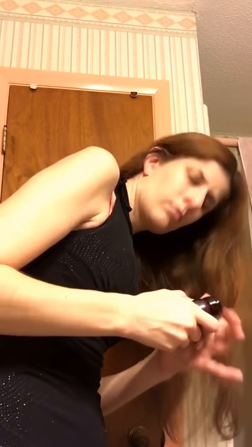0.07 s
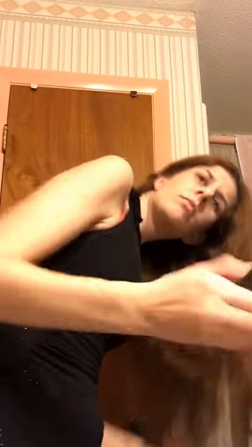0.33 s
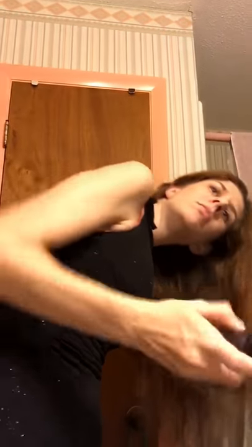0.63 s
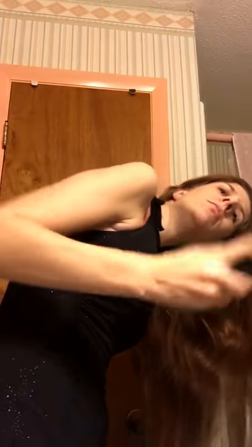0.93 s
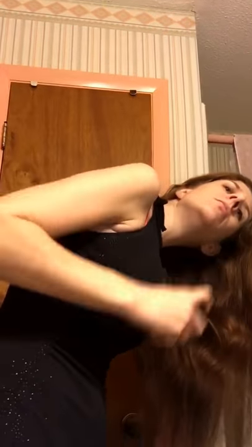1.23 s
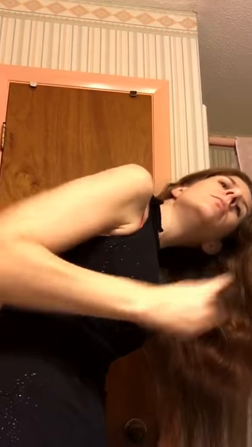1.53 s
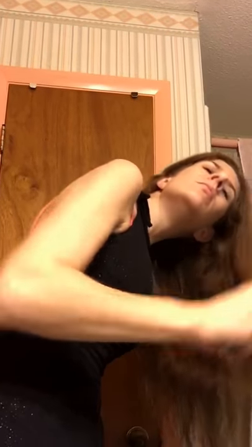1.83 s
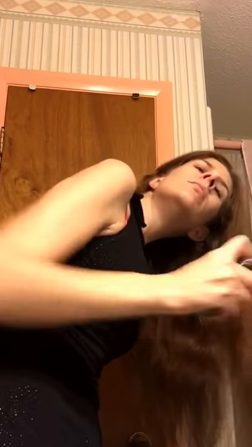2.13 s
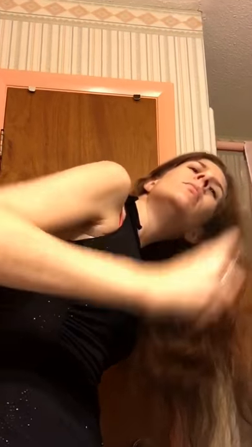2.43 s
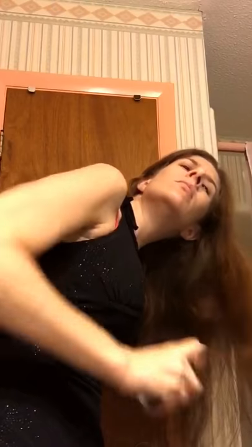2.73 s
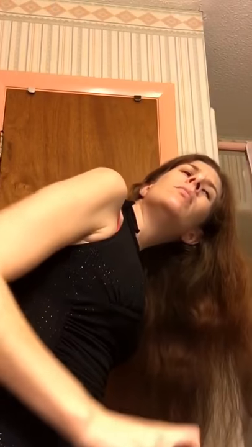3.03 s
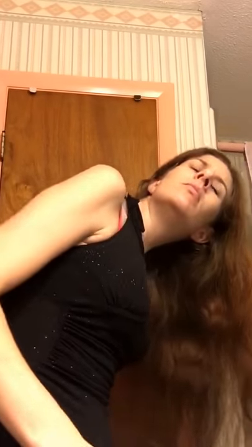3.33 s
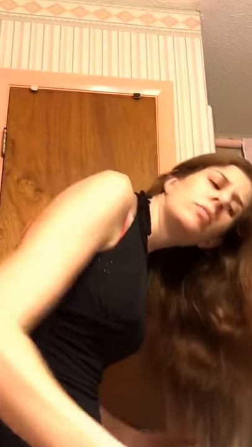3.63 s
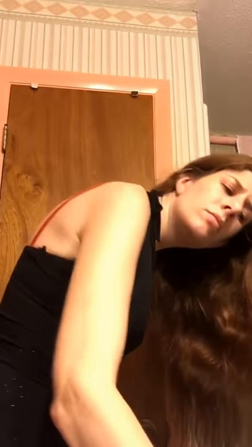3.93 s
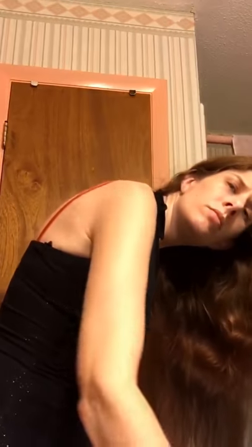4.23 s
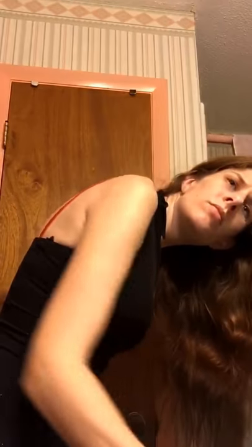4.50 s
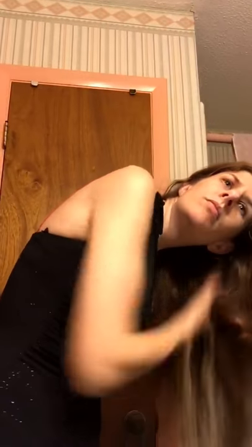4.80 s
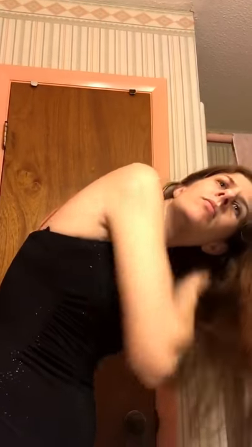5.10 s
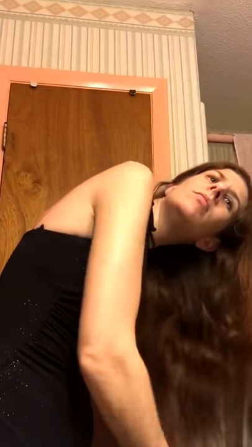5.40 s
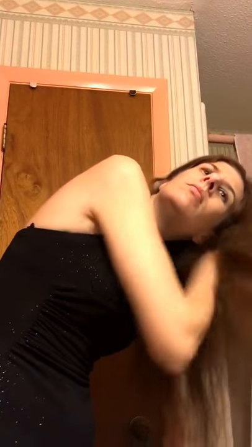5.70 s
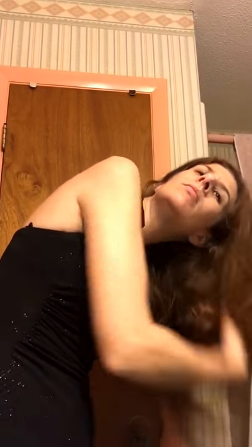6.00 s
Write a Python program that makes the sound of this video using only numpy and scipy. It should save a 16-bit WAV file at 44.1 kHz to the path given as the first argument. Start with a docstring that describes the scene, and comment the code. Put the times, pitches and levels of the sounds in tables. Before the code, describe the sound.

A pump bottle sprays hair twice, then knocks down on a counter, followed by faint hair combing in a small quiet room.

```python
"""A small plastic pump bottle mists long hair twice, a short puff and a long spray: its jet hisses
and breaks into droplets. Fingers tick and rub on the bottle as it is turned in the hand.
Its base then knocks twice on a counter, and a hand combs through the hair, palm swishing.
The small room answers briefly; a fan's air murmurs in it and a far engine hums through the walls."""
import sys
import numpy as np
from scipy import signal
from scipy.fft import rfft, irfft, next_fast_len
from scipy.io import wavfile
from scipy.ndimage import map_coordinates

SR = 44100
rng = np.random.default_rng(int(sys.argv[2]) if len(sys.argv) > 2 else 0)


def generate_wav(signal):
    """Clip the signal to [-1, 1] and save it as 16-bit WAV at the path in sys.argv[1]."""
    frames = np.transpose(np.atleast_2d(signal))
    scaled = np.clip(frames, -1, 1) * 32767
    pcm = np.round(scaled).astype(np.int16)
    wavfile.write(sys.argv[1], SR, pcm)


N = 267025
TIME = np.arange(N) / SR


def amp(db):
    """Decibels to gain."""
    return 10 ** (np.asarray(db) / 20)


def unit_rms(x):
    """Scaled to rms 1."""
    return x / np.sqrt(np.mean(x ** 2) + 1e-20)


def unit_energy(x):
    """Scaled to energy 1."""
    return x / (np.linalg.norm(x) + 1e-20)


def along(points, hz):
    """(Hz, value) points joined on a log frequency axis."""
    point_hz, values = np.transpose(points)
    return np.interp(np.log(hz + 1), np.log(point_hz + 1), values)


def bump(centre_s, sigma_s):
    """Gaussian swell of height 1."""
    return np.exp(-.5 * ((TIME - centre_s) / sigma_s) ** 2)


def wobble(knots_per_s):
    """Smooth random curve, rms near 1."""
    knots = rng.standard_normal(int(N * knots_per_s / SR) + 4)
    return map_coordinates(knots, [TIME * knots_per_s])


def filtered(x, response):
    """x through a complex frequency response."""
    size = next_fast_len(len(x) + SR // 2)
    return irfft(rfft(x, size) * response(np.fft.rfftfreq(size, 1 / SR)), size)[:len(x)]


def coloured(x, spectrum):
    """x shaped by (Hz, dB) points, at rms 1."""
    return unit_rms(filtered(x, lambda hz: amp(along(spectrum, hz))))


def resonances(modes, hz):
    """Causal response of (Hz, width Hz, dB) modes."""
    return sum(amp(db) * 1j * hz * width / (centre ** 2 - hz ** 2 + 1j * hz * width)
               for centre, width, db in modes)


def grainy(grains_per_s, grain_db):
    """White noise strewn with tiny uneven impacts."""
    impacts = (rng.random(N) < grains_per_s / SR) * rng.standard_normal(N)
    return unit_rms(rng.standard_normal(N) + amp(grain_db) * unit_rms(impacts))


def add(track, start_s, sound):
    """Mix a sound into a track."""
    part = track[round(start_s * SR):][:len(sound)]
    part += sound[:len(part)]


# Room decay. Each row: frequency in Hz, T60 in s.
ROOM_T60 = [(120, 0.32), (400, 0.37), (1000, 0.34), (2400, 0.25), (4000, 0.19), (7000, 0.25), (15000, 0.23)]
def in_room(x, wet_db):
    """Direct sound, eight wall echoes and a tail that dies sooner in the treble; power is kept."""
    hz, t, noise = signal.stft(rng.standard_normal(SR // 2), SR, nperseg=256)
    decay = amp(-60 * t / along(ROOM_T60, hz)[:, None])
    onset = 1 - np.exp(-t / 0.0026)
    tail = unit_energy(signal.istft(noise * decay * onset, SR, nperseg=256)[1])
    wall_lags = (SR * rng.uniform(.002, .018, size=8)).astype(int)
    tail[wall_lags] += 0.18 * rng.choice([-1, 1], size=8)
    response = amp(wet_db) * tail
    response[0] += 1
    return signal.fftconvolve(x, unit_energy(response))[:len(x)]


# Revs drop, then creep up. Each row: time in s, firing rate in Hz.
ENGINE_REVS = [(0, 83), (.45, 88), (.8, 89.5), (1.5, 82.5), (2.1, 61.3), (2.9, 62.75), (3.7, 65.4),
               (4.3, 67.2), (5.1, 69.54), (6.05, 68.2)]
# Low room modes. Each row: centre in Hz, sigma in Hz, rms level in dB.
ROOM_BOOMS = [(67.1, 1.35, -63), (84, 3.5, -63)]
def far_engine(leak_db=-76.5, waver_db=2, load_db=-61, load_peak_s=3.754):
    """Two orders pass the walls: the first booms at room modes, the second swells under load."""
    firing_hz = np.interp(TIME, *np.transpose(ENGINE_REVS))
    phase = 2 * np.pi * np.cumsum(firing_hz) / SR
    boom = sum(amp(db) * np.exp(-.5 * ((firing_hz - hz) / sigma_hz) ** 2)
               for hz, sigma_hz, db in ROOM_BOOMS)
    load = bump(load_peak_s, sigma_s=np.where(TIME < load_peak_s, 0.91, 0.64))
    first = (amp(leak_db) + boom) * amp(waver_db * wobble(11)) * np.sin(phase)
    second = amp(load_db + .7 * wobble(12)) * load * np.sin(2 * phase)
    return np.sqrt(2) * (first + second)


# Fan whine. Each row: frequency in Hz, rms level in dB.
FAN_TONES = [(452, -85), (1040, -95)]
# Moving air. Each row: frequency in Hz, relative density in dB.
AIR_SPECTRUM = [(20, -12), (40, 1), (62, 11.5), (82, 12), (100, -2.5), (122, 8), (150, -1.5), (210, -2.5),
                (380, -6), (520, -7), (1200, -11.5), (2500, -13.5), (6500, -21), (8000, -24.5),
                (10400, -28.5), (12000, -26.5), (15500, -28.5)]
def fan(air_db=-69):
    """A steady murmur of air with a faint whine."""
    whine = sum(amp(db) * np.sqrt(2) * np.sin(2 * np.pi * hz * TIME + wobble(25))
                for hz, db in FAN_TONES)
    return whine + amp(air_db) * coloured(rng.standard_normal(N), AIR_SPECTRUM)


# Contact crackle. Each row: frequency in Hz, relative density in dB.
SNAP_SPECTRUM = [(300, 0.5), (1200, -4), (3500, 2.5), (6500, -7), (8000, -8), (10400, -12.5), (12500, -13),
                 (15500, -19)]
def contact_snap(t, t60_s):
    """The dry, fast-dying crackle of a contact on plastic."""
    return coloured(rng.standard_normal(len(t)), SNAP_SPECTRUM) * amp(-60 * t / t60_s)


# Each row: start in s, energy in dB, ring in Hz, width in Hz, snap re ring in dB.
FINGER_TICKS = [(.1111, -42, 2950, 1490, 3), (.1232, -43, 2200, 1200, 3.5), (.1725, -44, 4280, 400, -3),
                (.2419, -38.5, 3780, 450, -3.5), (.3185, -48, 4230, 400, -8), (.464, -36.5, 2370, 200, -6),
                (.4773, -27.5, 2300, 280, -11), (.6855, -32, 2370, 250, -9), (0.6869, -36.5, 2760, 1200, 2),
                (.6948, -39.5, 2320, 400, 2.5), (.7297, -44, 2290, 250, -16), (.75, -40, 2280, 250, -13),
                (.916, -37.5, 2330, 400, -15), (1.1626, -38, 2260, 498, -9), (1.5333, -42, 5024, 399.4, 1),
                (3.2225, -29.5, 2198, 550, -14.5)]
def finger_ticks():
    """Fingers tap a damped ring out of the bottle (low) or its pump (high)."""
    out, t = np.zeros(N), np.arange(SR // 10) / SR
    for start_s, db, ring_hz, width_hz, snap_db in FINGER_TICKS:
        fade = np.exp(-np.pi * width_hz * t)
        ring = np.sin(2 * np.pi * ring_hz * t) * fade * (1 - np.exp(-t / 0.0017))
        snap = contact_snap(t, t60_s=0.04) * (1 - np.exp(-t / 0.0018))
        add(out, start_s, amp(db) * (unit_energy(ring) + amp(snap_db) * unit_energy(snap)))
    return out


# Each row: centre in s, sigma in s, level in dB, ring in Hz.
PLASTIC_RUBS = [(.252, 0.028, -74, 4000), (.465, .028, -69.5, 2310), (0.473, .046, -77, 5800),
                (0.678, 0.1, -75, 3800), (1.556, 0.016, -62, 3450), (1.88, .028, -70.5, 4750),
                (3.07, 0.064, -75, 2240), (3.238, 0.015, -68, 2252), (3.444, 0.0096, -66, 4390),
                (3.645, 0.037, -75, 4400), (4.249, 0.016, -64.5, 3440), (4.776, 0.064, -77.5, 2280)]
def plastic_rubs():
    """Skin or the base slides briefly; friction rings the smooth plastic."""
    out = np.zeros(N)
    for centre_s, sigma_s, db, ring_hz in PLASTIC_RUBS:
        friction = grainy(grains_per_s=1200, grain_db=3)
        rub = filtered(friction, lambda hz: resonances([(ring_hz, ring_hz * 0.64, 0)], hz) ** 2)
        out += amp(db) * unit_rms(rub) * bump(centre_s, sigma_s)
    return out


def pump_flow(start_s, spit_s, full_s, let_go_s, level_db):
    """One press: the nozzle spits, opens fully, sags while held and dies once let go."""
    spit_share, sag_db_per_s, release_db_per_s = amp(-12.5), 7, 315
    spit = np.interp(TIME, [start_s, spit_s], [0, 1]) ** 2.6
    opening = np.interp(TIME, [spit_s, full_s], [0, 1]) ** 3.45
    attack = spit_share * spit + (1 - spit_share) * opening
    sag_db = sag_db_per_s * np.maximum(TIME - full_s, 0)
    release_db = release_db_per_s * np.maximum(TIME - let_go_s, 0)
    return attack * amp(level_db - sag_db - release_db)


# Jet resonances. Each row: centre in Hz, width in Hz, gain in dB.
NOZZLE_MODES = [(2110, 260, -9), (2900, 500, -23), (4400, 350, -12.5), (5500, 250, -9.5), (6700, 310, -7.5),
                (11600, 696, -11.5)]
# Mist hiss. Each row: frequency in Hz, relative density in dB.
MIST_SPECTRUM = [(50, -40), (90, -17), (124, -7.5), (200, -18.5), (350, -18), (560, -9.5), (900, -9.5),
                 (1400, -6), (1750, -8), (1950, -1), (2400, -3.5), (2900, -1), (4500, -3.5), (6600, -5),
                 (7800, -8.5), (9400, -7.5), (10400, -11.5), (12000, -8.5), (15700, -7)]
# Each row: centre in s, sigma in s, band in Hz, width in Hz, gain of the added band in dB.
SWEEP_SWELLS = [(2.346, 0.024, 3100, 600, 0), (2.462, 0.02, 4380, 420, 3), (2.49, 0.047, 6400, 908, -5.5),
                (2.683, 0.027, 2400, 900, -5.5), (2.83, 0.052, 3930, 596, -3)]
def jet_hiss(waver_db=4):
    """The jet breaks into droplets; single bands swell as it sweeps along the hair."""
    jet = grainy(grains_per_s=1500, grain_db=-10) * amp(0.71 * wobble(70))
    # the lowest mode comes and goes as the bottle turns
    hollow = amp(waver_db * wobble(14)) * filtered(jet, lambda hz: resonances(NOZZLE_MODES[:1], hz))
    bright = filtered(jet, lambda hz: 1 + resonances(NOZZLE_MODES[1:], hz))
    hiss = coloured(hollow + bright, MIST_SPECTRUM)
    swells = sum(bump(centre_s, sigma_s) * filtered(hiss, lambda hz: resonances([band], hz))
                 for centre_s, sigma_s, *band in SWEEP_SWELLS)
    return hiss + swells


# Each row: start, first spit, full flow and let-go in s, relative level in dB.
PUMP_PRESSES = [(1.522, 1.62, 1.692, 1.746, -35), (2.202, 2.247, 2.29, 2.898, -34)]
def spray(sway_hz=3.86, sway_db=1.48, nearest_s=2.465):
    """The hand swings the hissing nozzle; strong flow drums on the hair, a dribble lacks fizz."""
    sway = amp(sway_db * np.cos(2 * np.pi * sway_hz * (TIME - nearest_s)))
    flow = sway * sum(pump_flow(*press) for press in PUMP_PRESSES)
    hiss = jet_hiss()
    body = filtered(hiss, lambda hz: 1 / (1 + (hz / 1300) ** 4))
    fizz = filtered(hiss, lambda hz: 1 - 1 / (1 + (hz / 7000) ** 4))
    pressure = np.minimum(flow / amp(-42.5), 1)
    dribble = np.exp(-flow / amp(-59))
    mist = flow * (hiss - (1 - pressure) * body - dribble * fizz)
    return amp(0.2) * in_room(mist, wet_db=-10)


def scattered(x, count, feedback=.7):
    """Nearby objects bounce a blow about for milliseconds; all-pass, so its colour stays."""
    for delay_s in rng.uniform(.0008, .0035, size=count):
        bounce = lambda hz: np.exp(-2j * np.pi * hz * delay_s)
        x = filtered(x, lambda hz: (bounce(hz) - feedback) / (1 - feedback * bounce(hz)))
    return x


# Each row: start in s, energy in dB, contact time in s, click re thud in dB.
BASE_KNOCKS = [(4.1450, -6, 0.000546, -28.5), (4.3172, -5, 0.00033, -26)]
# Each row: centre in Hz, width in Hz, relative gain in dB.
COUNTER_MODES = [(123, 21, 3), (261.4, 64, -3.5), (539, 20, 2.5), (727, 51, -4), (920, 140, -7),
                 (1055, 120, -1), (1323, 130, 2.5), (1570, 200, 1), (2170, 520, 5.5), (2820, 790, -8),
                 (3360, 1150, 8), (4160, 500, 13)]
def set_down(cutoff_hz=5300):
    """One edge of the base hits the counter, then the other; shorter contact is brighter."""
    out, t = np.zeros(N), np.arange(SR // 2) / SR
    for start_s, db, contact_s, click_db in BASE_KNOCKS:
        push = np.sin(np.pi * np.minimum(t / contact_s, 1))
        # the soft plastic passes little treble into the counter
        thud = filtered(push, lambda hz: resonances(COUNTER_MODES, hz) / (1 + (hz / cutoff_hz) ** 6))
        click = amp(click_db) * unit_energy(contact_snap(t, t60_s=0.031))
        knock = scattered(unit_energy(thud) + click, count=2)
        add(out, start_s, amp(db) * unit_energy(in_room(knock, wet_db=-1)))
    return out


# Each row: centre in s, sigma in s, relative strand and swish levels in dB, palm lag in s.
HAIR_STROKES = [(4.935, 0.091, -66.5, -61.5, 0.011), (5.27, 0.077, -68, -70.5, .055),
                (5.545, 0.037, -78, -69, 0.0029), (5.778, 0.06, -67.5, -65, .003),
                (5.99, 0.072, -68.5, -70.5, .05)]
# Palm and strand noise. Each row: frequency in Hz, relative density in dB.
SWISH_SPECTRUM = [(300, -17), (600, -9), (900, -0.5), (1150, 1.5), (1500, -5.5), (2500, -5), (5000, -37)]
STRAND_SPECTRUM = [(900, -13), (2200, 2), (3000, 1.5), (4500, -2), (6500, -6), (8000, -10.5),
                   (10400, -13.5), (12000, -12), (15500, -13)]
def combing(palm_time_share=0.57):
    """The palm swishes over the hair while single strands slip through the fingers."""
    palm, fingers = np.zeros((2, N))
    for centre_s, sigma_s, strand_db, swish_db, lag_s in HAIR_STROKES:
        palm += amp(swish_db) * bump(centre_s + lag_s, palm_time_share * sigma_s)
        fingers += amp(strand_db) * bump(centre_s, sigma_s)
    swish = coloured(rng.standard_normal(N), SWISH_SPECTRUM)
    strands = coloured(grainy(grains_per_s=760, grain_db=-6.5), STRAND_SPECTRUM)
    return amp(-1.5) * palm * swish + amp(-2.5) * fingers * strands


def scene():
    """All sources, the same in both channels."""
    background = far_engine() + fan()
    handling = in_room(finger_ticks() + plastic_rubs(), wet_db=-6)
    sound = background + handling + spray() + set_down() + combing()
    return np.array([sound, sound])


def record(dry):
    """Steep low-pass at the band limit."""
    top_hz = 15800
    edge = lambda hz: np.exp(-(np.minimum(hz / top_hz, 2) ** 200))
    return np.array([filtered(channel, edge) for channel in dry])


dry = scene()
out = record(dry)
generate_wav(out)
```